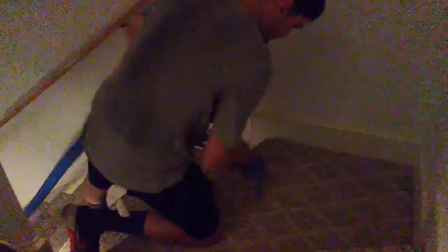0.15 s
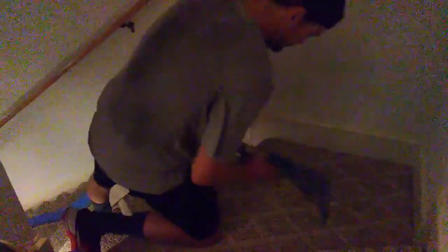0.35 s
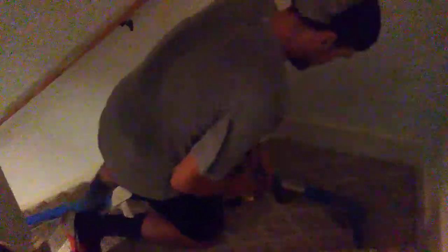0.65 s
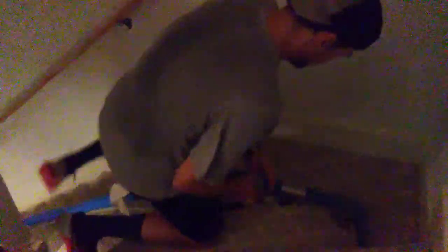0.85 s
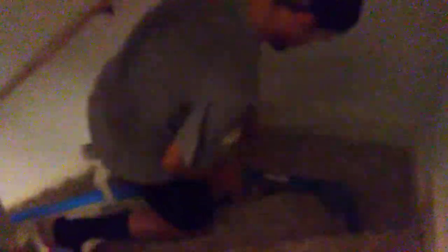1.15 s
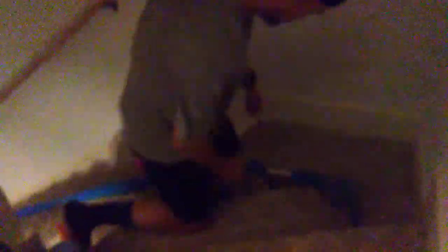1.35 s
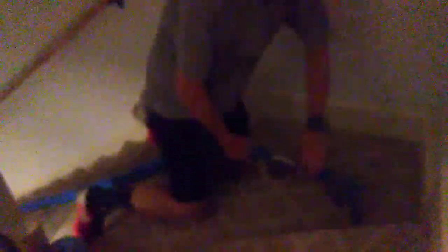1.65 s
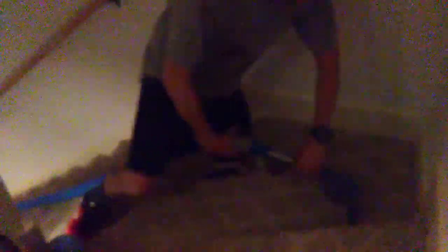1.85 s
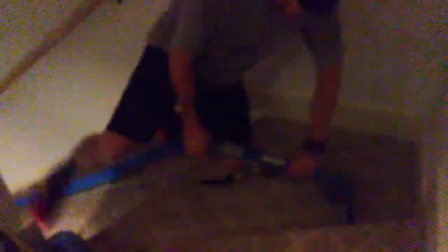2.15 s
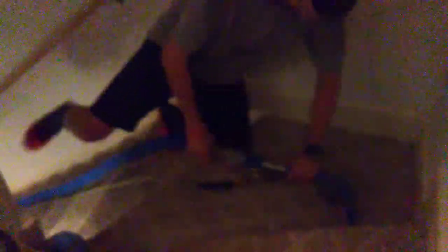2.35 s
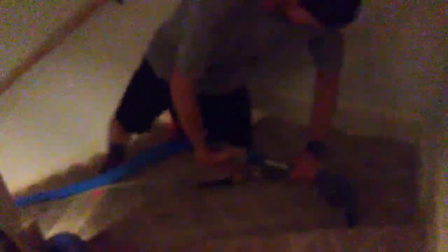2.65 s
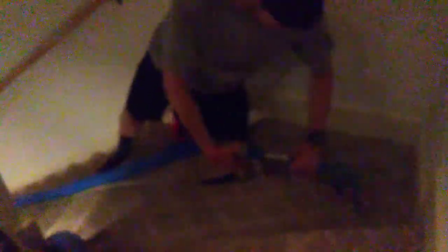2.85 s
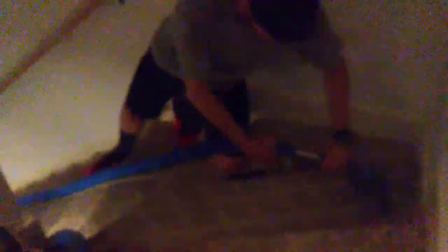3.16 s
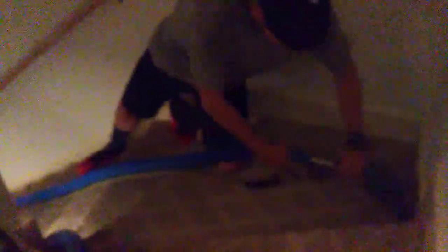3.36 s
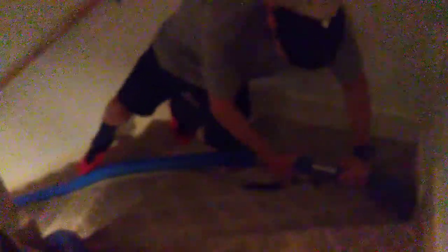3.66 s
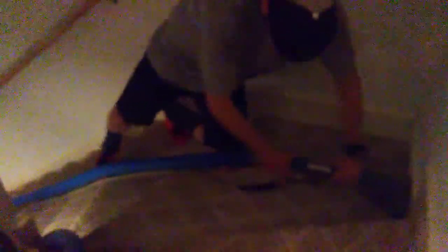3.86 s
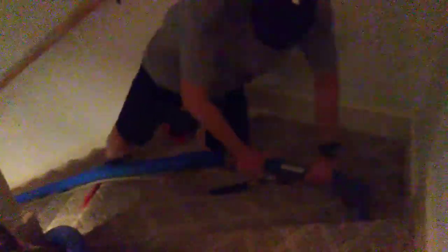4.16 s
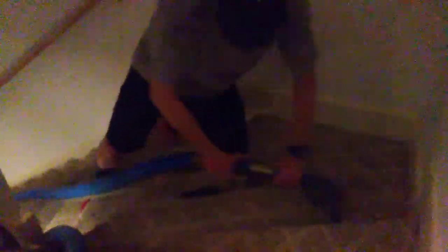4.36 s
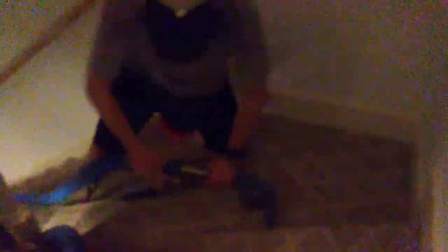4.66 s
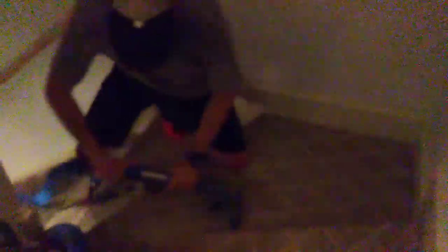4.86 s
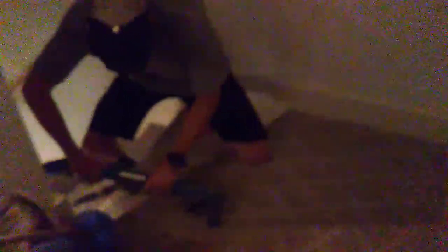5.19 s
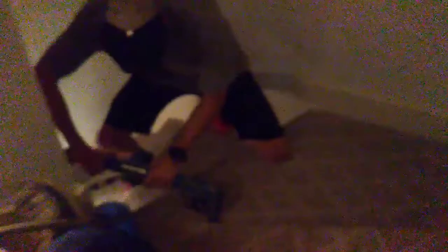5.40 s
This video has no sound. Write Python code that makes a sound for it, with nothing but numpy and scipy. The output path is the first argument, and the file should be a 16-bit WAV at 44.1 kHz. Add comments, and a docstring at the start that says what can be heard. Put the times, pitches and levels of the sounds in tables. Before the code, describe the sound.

A carpet extractor nozzle scrapes over hollow carpeted stairs, with muffled rumbles, knocks and whistly suction, then opens into a loud, steady spraying hiss.

```python
"""A carpet extractor hand tool is worked over stair carpet, close to a single microphone.
Air and spray hiss at the nozzle slot as coloured noise and droplet clicks; suction rushes and moans
through resonances, and the sealed tube sings as breathy noise with a fainter wavering whistle. The head
rumbles over the hollow treads as noise and slips through their modes; knees, hose and tool knock the
stairs as decaying sines over a far motor hum and steady microphone hiss."""
import sys
import numpy as np
from scipy import signal
from scipy.fft import rfft, irfft, next_fast_len
from scipy.io import wavfile
from scipy.ndimage import uniform_filter1d

SR = 44100
rng = np.random.default_rng(int(sys.argv[2]) if len(sys.argv) > 2 else 0)


def wav_record(signal):
    """Record a signal, one row per channel, as 16-bit PCM in the file named by sys.argv[1]."""
    frames = np.transpose(np.atleast_2d(signal))
    bounded = np.clip(frames, -1, 1)
    # unit amplitude maps onto the largest positive 16-bit level
    quanta = np.round(bounded * 32767).astype(np.int16)
    wavfile.write(sys.argv[1], SR, quanta)


N = 243873

# modes of the hollow tread, and at 917 Hz a ring of the tool: (frequency [Hz], width [Hz], relative level [dB])
TREAD_MODES = [(63, 3.4, -14), (179, 46, -9), (207.2, 31, -6.5), (249.5, 24.6, 0.5), (326.4, 34.4, -0.5),
               (373, 22, -2), (451, 54, -2.5), (551, 39.6, -2), (615.3, 50, -2.5), (666.7, 39, -10),
               (811, 80, -10.5), (917, 45, -14.5)]


def gain_of(db):
    """Amplitude factor of a level in dB."""
    return 10 ** (np.asarray(db) / 20)


def evened(x):
    """Scale to an rms of 1."""
    return x / np.sqrt(np.mean(x ** 2) + 1e-20)


def read(points, hz):
    """Read a spectral curve, interpolated over log frequency."""
    f, value = np.transpose(points)
    return np.interp(np.log(hz + 1), np.log(f + 1), value)


def played(rows):
    """Columns of a time curve table, one value a sample."""
    s, *columns = np.transpose(rows)
    return [np.interp(np.arange(N) / SR, s, column) for column in columns]


def wander(span_s):
    """Slow smooth random motion of rms 1: noise averaged twice over the span."""
    size = round(span_s * SR)
    once = uniform_filter1d(rng.standard_normal(N), size)
    return evened(uniform_filter1d(once, size))


def resonate(x, hz, width):
    """One complex pole: a resonance with a gain of about 1 at its peak."""
    r = np.exp(-np.pi * width / SR)
    return 2 * signal.lfilter([1 - r], [1, -r * np.exp(2j * np.pi * hz / SR)], x).real


def rung(x, modes):
    """Drive a set of parallel resonances: (frequency [Hz], width [Hz], relative level [dB])."""
    return evened(sum(gain_of(db) * evened(resonate(x, f, width)) for f, width, db in modes))


def air(colour, patchy_db, flicker_db):
    """Airy noise: random short spectra with drifting patches and a flicker shared by all pitches."""
    frames, hz = N // 128 + 5, np.fft.rfftfreq(512, 1 / SR)
    real, imaginary, patches = rng.standard_normal((frames, 257, 3)).T
    patches = uniform_filter1d(patches, size=7, axis=0)  # across frequency
    patches = evened(uniform_filter1d(patches, size=24, axis=1))  # across time
    flicker = evened(uniform_filter1d(rng.standard_normal(frames), size=12))
    level_db = read(colour, hz)[:, None] + patchy_db * patches + flicker_db * flicker
    spectra = (real + 1j * imaginary) * gain_of(level_db)
    return evened(signal.istft(spectra, nperseg=512, noverlap=384)[1][:N])


def slips(per_s, spread_db):
    """Sparse clicks at random moments, of uneven size and sign."""
    when, size, sign = rng.random((3, N))
    clicks = when < per_s / SR
    sizes = gain_of(-spread_db * np.log(size + 0.0046))  # many small, few large
    return evened(clicks * sizes * np.sign(sign - .5))


def gurgle():
    """Wet air flow: patchy, flickering noise with small pops of water."""
    # (frequency [Hz], relative spectral level [dB])
    flow_colour = [(100, 16.0), (5000, 3.0), (8000, -51)]
    flow = air(flow_colour, patchy_db=1.5, flicker_db=2.0)
    return flow + .25 * slips(per_s=600, spread_db=3)


def microphone_hiss():
    """Microphone hiss: coloured noise at a constant average level under everything."""
    # colour of the hiss: (frequency [Hz], relative spectral level [dB])
    hiss_colour = [(300, -21), (8000, -6), (15000, -4)]
    return gain_of(-61) * air(hiss_colour, patchy_db=1.5, flicker_db=1)


def hum():
    """Fuzzy low tones of the far motor: noise passed twice through each resonance."""
    # motor tones: (frequency [Hz], width of each pass [Hz], rms level [dB])
    motor_tones = [(57, 41, -59), (87.2, 5.3, -60)]
    out = 0
    for f, width, db in motor_tones:
        once = resonate(rng.standard_normal(N), f, width)
        out = out + gain_of(db) * evened(resonate(once, f, width))
    return out


def knocks():
    """Each blow by knee, hose or tool rings the modes near its pitch, of the tread or the tool; narrow modes
    ring longer."""
    # blows on the stairs: (time [s], drive level [dB], pitch near which the blow lands [Hz])
    blows = [(.408, -28, 62), (1.019, -17, 325), (1.3, -23, 250), (1.442, -11.5, 970), (1.455, -21.5, 235),
             (2.938, -12, 196), (2.951, -9.5, 217), (2.965, -36, 250), (2.984, -19, 239)]
    out, t = np.zeros(N), np.arange(SR // 3) / SR
    softening_s = .005  # rounds the onset
    for s, db, hz in blows:
        octaves_away = np.log2(np.array(TREAD_MODES)[:, 0] / hz)
        nearness = gain_of(-110. * octaves_away ** 2)
        ring = sum(near * np.exp(-np.pi * width * t) * np.sin(2 * np.pi * f * t)
                   for near, (f, width, _) in zip(nearness, TREAD_MODES))
        out[round(s * SR):][:len(t)] += gain_of(db) * ring * (1 - np.exp(-t / softening_s))
    return out


def drag():
    """The head sticks and slips over the pile: noise and clicks shake the modes of the tread."""
    # head pressed along the tread: (time [s], level [dB], tilt to higher modes [dB per octave])
    strokes = [(0, -29.5, 0), (.1, -35, 8.5), (.25, -32.5, 3.5), (.6, -34, 4.5), (.72, -33.5, 4.5),
               (.76, -30, 4), (.91, -32, 2.5), (1.03, -29.5, 4), (1.18, -48.5, 4.5), (1.6, -43.5, 5.5),
               (1.68, -43.5, 2.5), (2.1, -46, 0), (2.35, -50, -2), (2.58, -45.5, 1), (2.67, -35, -4.5),
               (2.755, -37, -4), (2.78, -29, 3.5), (3, -32.5, 2), (3.43, -34, 3), (3.56, -45.5, 3),
               (3.8, -55.5, 11), (3.97, -29, 3.5), (4.09, -37, 2), (4.3, -32, 1.5), (4.5, -29, -2),
               (4.6, -34.5, -1.5), (5, -35, -3.5), (5.1, -43, 0.5), (5.53, -41, 2)]
    level_db, tilt_db = played(strokes)
    judder_db = 1.5 * wander(span_s=0.017)  # uneven grip of the pile
    shake = rng.standard_normal(N) + .6 * slips(per_s=300., spread_db=3.)
    body = 0
    for f, width, db in TREAD_MODES:
        mode = evened(resonate(resonate(shake, f, 2 * width), f, width))
        body = body + gain_of(db + tilt_db * np.log2(f / 350)) * mode  # tilt pivots at 350 Hz
    return gain_of(level_db + judder_db) * evened(body)


def tube():
    """While the pile seals the slot, narrow tube resonances sing: mostly breath, a fainter whistle."""
    # resonances of the sealed tube: (frequency [Hz], width [Hz], relative level [dB])
    tube_modes = [(1745, 50, 0), (2000, 80, -9), (2790, 40, -5), (2940, 50, -8), (3665, 50, -4),
                  (3990, 50, -11)]
    # spells with the slot sealed on the pile, each a list of: (time [s], level [dB])
    sealed_spells = [
        [(0, -22.5), (.06, -40.5), (.12, -43), (.38, -40), (.5, -43.5), (.68, -44.5), (.75, -40), (1.0, -39),
         (1.12, -49)],
        [(2.72, -50), (2.78, -41), (2.9, -46.5), (2.985, -37.5), (3.05, -39), (3.2, -37.5), (3.28, -50),
         (3.36, -42), (3.46, -40)],
    ]
    whistle_share, waver_hz, waver_s = .5, 22., .02  # amplitude share; rms spread and span of wavering
    t = np.arange(N) / SR
    level = sum(gain_of(np.interp(t, *np.transpose(rows), left=-90, right=-90)) for rows in sealed_spells)
    whistle = 0
    for f, _, db in tube_modes:
        pitch_hz = f + waver_hz * wander(waver_s)
        whistle = whistle + gain_of(db) * np.sin(2 * np.pi * np.cumsum(pitch_hz) / SR)
    breath = rung(gurgle(), tube_modes)
    song = whistle_share * evened(whistle) + np.sqrt(1 - whistle_share ** 2) * breath
    return uniform_filter1d(level, size=800) * song  # level smoothed over 18 ms


def mouth_swells():
    """Gain of the hose mouth: moans and a brief burst swell fast and fade at their own speeds."""
    # moans, and at 1.45 s a brief burst that goes with a knock:
    # (time of the top [s], level [dB], fading rate [dB per s])
    swell_tops = [(0, -40, 30), (.4, -38.5, 29), (.77, -33.5, 53), (1.03, -37, 50), (1.45, -38, 250),
                  (1.71, -36.5, 16), (2.46, -41, 48), (2.66, -36.5, 18), (3.46, -46, 20), (3.92, -31.5, 46),
                  (4.36, -33, 30), (4.59, -31.5, 21)]
    s, db, fade_db = np.transpose(swell_tops)[:, :, None]
    t = np.arange(N) / SR - s
    slope_db = np.minimum(162 * t, -fade_db * t)  # rises at 162 dB per s
    return gain_of((db + slope_db).max(0))  # the loudest swell wins


def suction(steady, gasp):
    """Air rushes past the slot's broad resonances, and the hose mouth moans now and then."""
    # open slot, then hose mouth: (frequency [Hz], width [Hz], relative level [dB])
    slot_modes = [(1986, 360, 3.5), (3100, 380, -4.6), (3840, 250, -2)]
    mouth_modes = [(830, 50, -5), (955, 45, -1), (996, 32, -3), (1120, 50, -5)]
    # colour of the inrush: (frequency [Hz], relative spectral level [dB])
    inrush_colour = [(300, -25), (800, -12), (1500, -9), (4000, -17), (6000, -49)]
    inrush = 0.69 * rung(gurgle(), slot_modes) + air(inrush_colour, patchy_db=0.5, flicker_db=0.7)
    return np.hypot(steady, gasp) * inrush + mouth_swells() * rung(gurgle(), mouth_modes)


def gasps():
    """Air gasps in as the seal breaks, or swells softly: hiss and inrush gains rise, then die away."""
    # gasps and soft swells: (time [s], hiss drive [dB], inrush drive [dB], rise time [s], dying time [s])
    air_bursts = [(0, -29.5, -29.5, .001, 0.023), (.385, -24, -29.5, 0.0054, .035),
                  (.725, -31.5, -30.5, 0.0064, 0.1), (.93, -49, -31.5, .006, 0.053),
                  (.975, -17, -30, 0.049, 0.065), (2.755, -28, -29, 0.0067, 0.032),
                  (2.945, -32, -42, 0.037, 0.064), (3.265, -38, -58, 0.025, 0.1),
                  (3.432, -29, -27.5, .005, 0.032), (4.48, -17, -31, 0.045, 0.1)]
    s, hiss_db, inrush_db, rise_s, dying_s = np.transpose(air_bursts)[:, :, None]
    t = np.maximum(np.arange(N) / SR - s, 0)
    shape = (1 - np.exp(-t / rise_s)) ** 2 * np.exp(-t / dying_s)
    return (gain_of(hiss_db) * shape).sum(0), (gain_of(inrush_db) * shape).sum(0)


def jet(steady, mist_db, gasp):
    """Turbulent hiss at the slot, with fine droplets spitting in it; mist sets the level of the top."""
    # colour of the jet: (frequency [Hz], relative spectral level [dB])
    jet_colour = [(300, -15), (1000, -26), (2000, -2.5), (3800, 2.5), (6200, -5.5), (7300, -0.5),
                  (8400, -1), (10500, -10), (13000, -19), (15200, -14)]
    gasp_mist_db = -7  # a gasp has less top
    grid = np.linspace(0, 1, 129)
    droplet_filter = signal.firwin2(255, grid, gain_of(read(jet_colour, grid * SR / 2)))
    drops = evened(signal.oaconvolve(slips(per_s=2300.0, spread_db=2.0), droplet_filter, "same"))
    hiss = evened(air(jet_colour, patchy_db=1.29, flicker_db=0.34) + 0.16 * drops)
    # split the hiss at 10.8 kHz
    top = signal.oaconvolve(hiss, signal.firwin(63, 10800., pass_zero=False, fs=SR), "same")
    body_gain = np.hypot(steady, gasp)
    top_gain = np.hypot(gain_of(mist_db) * steady, gain_of(gasp_mist_db) * gasp)
    return body_gain * (hiss - top) + top_gain * top


def scene():
    """Mix the nozzle, drag, knocks, hum and hiss, the same in both channels."""
    # air passing the slot as the head tips and seals:
    # (time [s], hiss level [dB], mist gain on the top of the hiss [dB], inrush level [dB])
    slot_flow = [(0, -40, 0, -36), (.36, -39.5, -1, -62), (.62, -42.5, -5, -45.5), (.715, -48, -2, -38.5),
                 (.9, -46, 1, -37.5), (1.14, -35, 3, -39), (1.45, -35, 2, -39), (1.98, -32.5, 3, -37),
                 (2.19, -30.5, 0.5, -41.5), (2.35, -35.5, 9.5, -52), (2.48, -30, 0.5, -42),
                 (2.74, -35, 2, -40.5), (2.81, -48, -4, -40.5), (2.93, -46.5, -1, -50),
                 (3.1, -50.5, 13, -42.5), (3.25, -58, 7, -45), (3.42, -45.5, -6, -44),
                 (3.5, -24.5, -1.5, -33), (3.82, -25.5, 3, -37), (3.97, -18, -2, -25.5),
                 (4.07, -24, 1, -30), (4.3, -24.5, 2.5, -30), (4.6, -26, 1, -35.5), (4.92, -25, 2, -34),
                 (5.22, -27, 1, -37), (5.53, -27, 2, -34)]
    hiss_db, mist_db, inrush_db = played(slot_flow)
    gasp_hiss, gasp_inrush = gasps()
    background = hum() + microphone_hiss()
    stairs = knocks() + drag()
    nozzle = tube() + suction(gain_of(inrush_db), gasp_inrush) + jet(gain_of(hiss_db), mist_db, gasp_hiss)
    return np.tile(background + stairs + nozzle, (2, 1))


def record(dry):
    """Microphone colour with its deep notch, then the band limit."""
    # microphone and its housing: (frequency [Hz], gain [dB])
    mic_colour = [(20, -26), (60, -17), (100, -2.5), (120, -18.5), (150, -5.5), (200, 0.5), (4000, -1),
                  (4100, -10), (4300, -14), (4400, -39.5), (4650, -50), (5000, -25), (5500, -11.5),
                  (6200, 0), (6800, 2)]
    size = next_fast_len(N + SR // 10)
    mic_gain = gain_of(read(mic_colour, np.fft.rfftfreq(size, 1 / SR)))
    coloured = irfft(rfft(dry, size) * mic_gain, size)[:, :N]
    band_limit = signal.firwin(1023, 15720, window=("kaiser", 9), fs=SR)  # low-pass edge in Hz
    return signal.oaconvolve(coloured, band_limit[None], "same")


dry = scene()
out = record(dry)
wav_record(out)
```